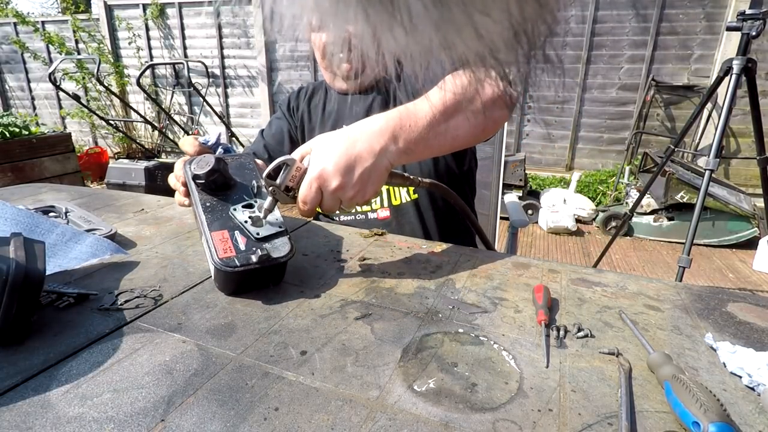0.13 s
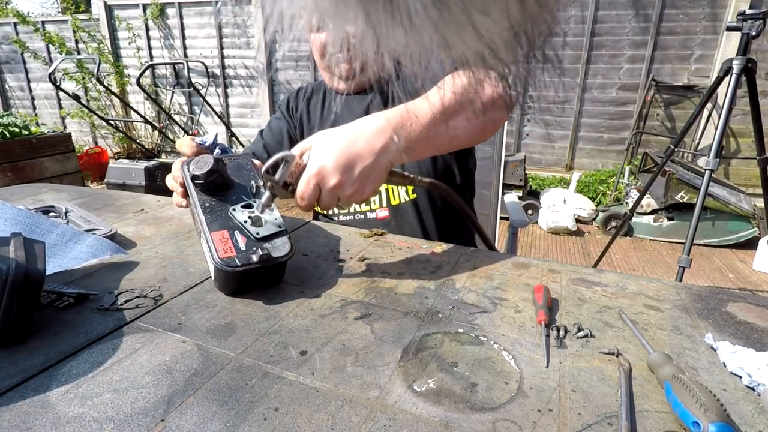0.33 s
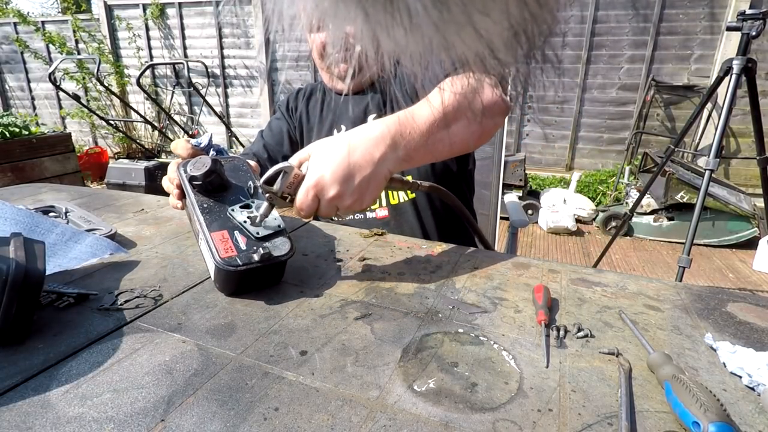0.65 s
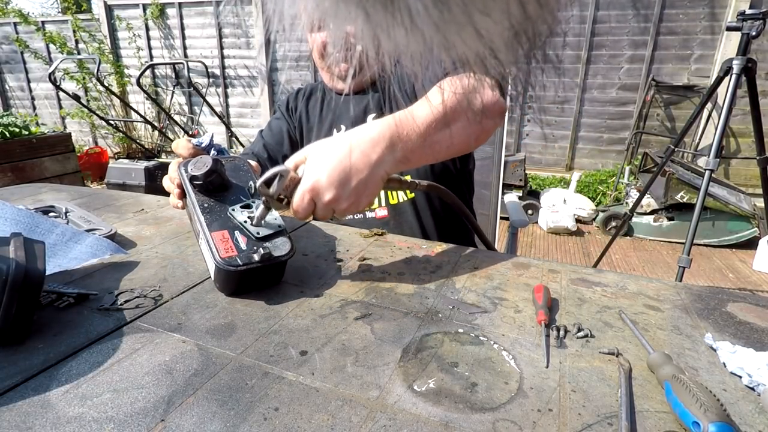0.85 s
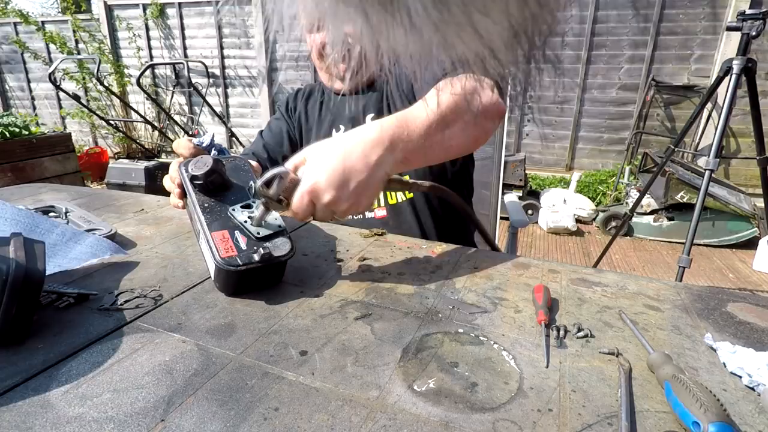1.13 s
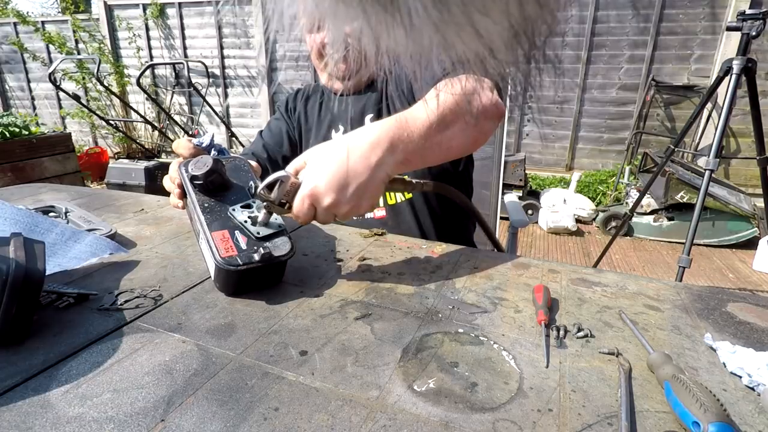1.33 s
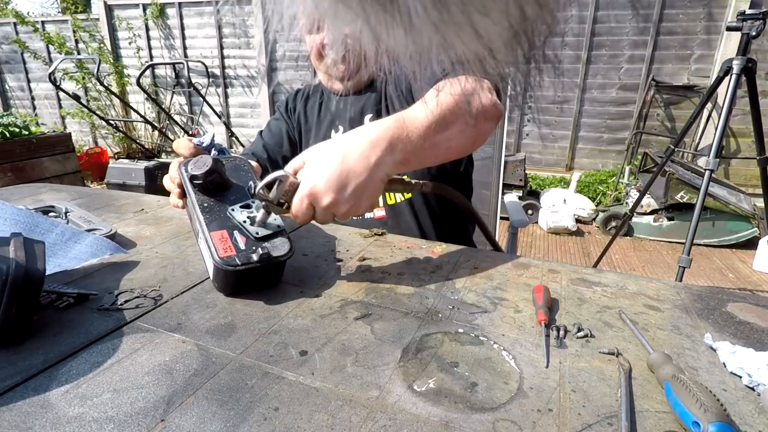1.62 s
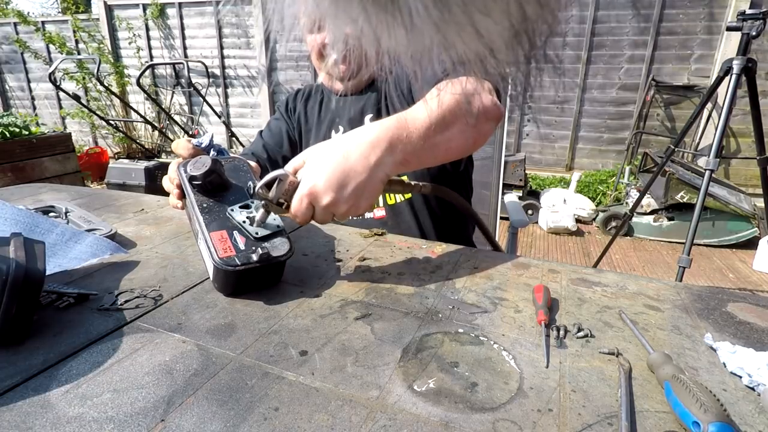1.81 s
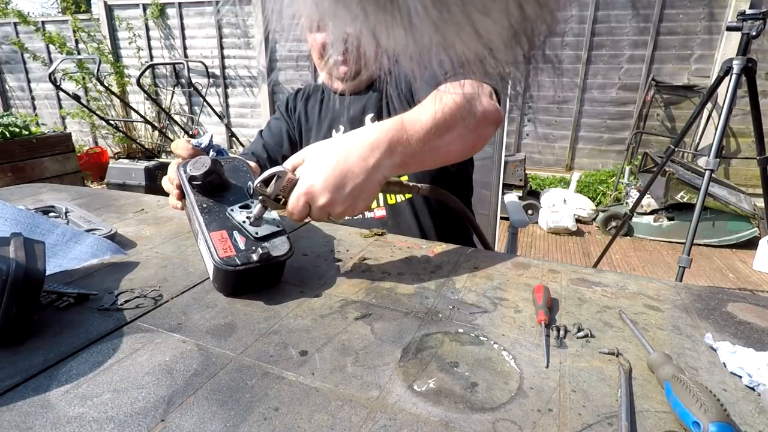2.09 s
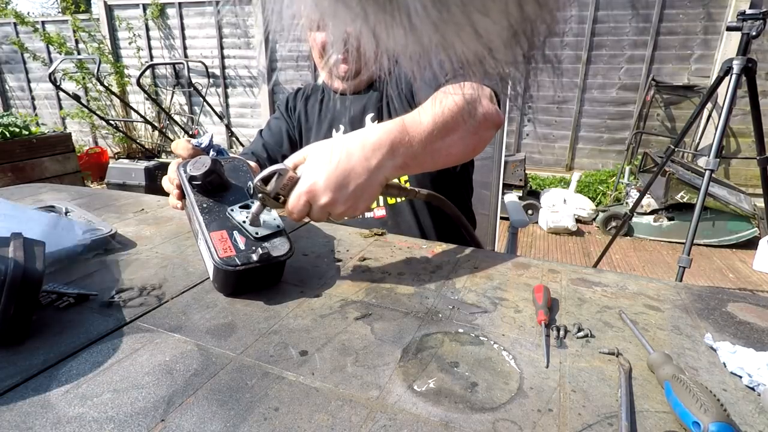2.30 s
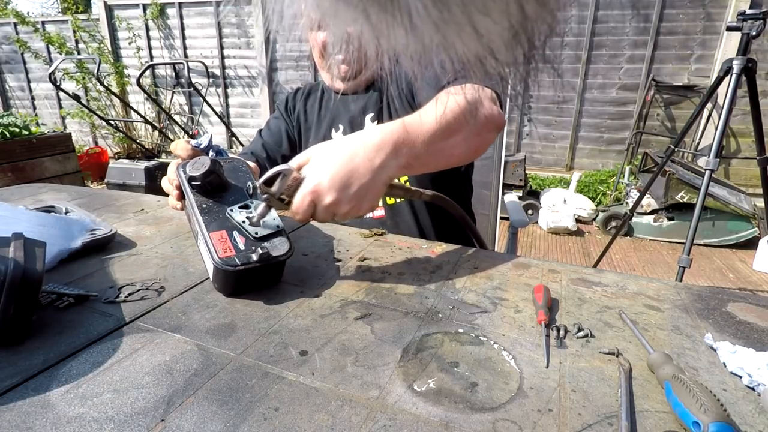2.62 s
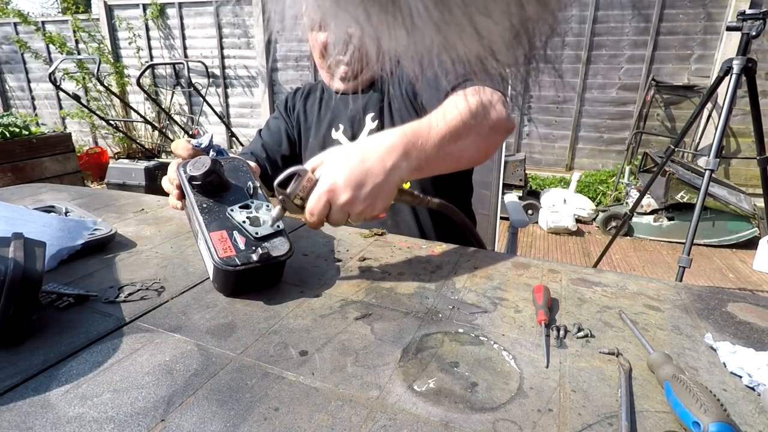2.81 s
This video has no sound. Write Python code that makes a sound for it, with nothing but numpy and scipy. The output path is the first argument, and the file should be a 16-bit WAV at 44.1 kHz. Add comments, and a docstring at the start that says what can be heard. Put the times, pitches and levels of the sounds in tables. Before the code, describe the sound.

A compressed-air blow gun hisses over a small engine part, one short blast, one long.

```python
"""An outdoor bench in a fenced yard: a blow gun cleans a small engine part, one short blast, one long.
The turbulent jet hisses, and roars and sputters in the hollows of the part; passing holes and edges
it whistles and squeals. Two knocks excite the modes of the part, stray air buffets the microphone,
and the bench and the yard return a faint tail."""
import sys
import numpy as np
from scipy import signal
from scipy.fft import rfft, irfft
from scipy.io import wavfile
from scipy.ndimage import uniform_filter1d

SR = 44100
rng = np.random.default_rng(int(sys.argv[2]) if len(sys.argv) > 2 else 0)


def pcm_store(signal):
    """Save signal as 16-bit PCM."""
    levels = np.round(np.clip(np.atleast_2d(signal), -1, 1) * 32767)
    wavfile.write(sys.argv[1], SR, levels.astype(np.int16).T)


N = 130095

# Spectra: frequency_hz, relative_db
BUFFET_SPECTRUM = [(5, 4.5), (24, -7.5), (40, -3), (55, -16.5), (80, -19.5), (130, -21), (250, -44.5),
                   (1000, -62.5), (16000, -100)]
AMBIENT_SPECTRUM = [(20, 0.5), (100, -6.5), (150, 7.5), (220, -11.5), (500, -15), (1200, -19),
                    (2400, -21.5), (3600, -16), (5200, -30), (16000, -39)]
PUFF_SPECTRUM = [(10, 2.5), (40, -8), (120, -18), (170, -7), (300, -36.5), (2000, -73.5), (16000, -88.5)]
ROAR_SPECTRUM = [(200, -46), (1700, -41.5), (2200, -25.5), (2700, -9), (3080, 1.5), (3400, 1.5),
                 (3800, -3.5), (4050, -8), (4300, -18), (4550, -16.5), (5100, -22), (5500, -33),
                 (9000, -35.5), (16000, -48.5)]
RUSH_SPECTRUM = [(60, -36), (150, -23.5), (190, -14), (230, -6), (290, -9), (420, -16.5), (520, -13),
                 (620, -17.5), (900, -11), (1180, -7.5), (1350, -19.5), (1650, -7.5), (1850, -8.5),
                 (2200, 2), (2420, 3), (2700, 1), (3500, -4), (5500, -26), (16000, -30)]
HISS_SPECTRUM = [(500, -39), (5000, -20.5), (8300, -15.5), (9200, -7.5), (10300, -7.5), (11100, -7),
                 (12050, -0.5), (12700, -1.5), (13900, 3), (15200, -3), (16000, -8.5)]
FREE_JET_SPECTRUM = [(150, -17.5), (300, 2), (2000, 1), (4700, 3.5), (5550, -6.5), (6150, 1), (6700, 0),
                     (7400, -2.5), (7800, 7), (8350, -6.5), (9200, -5.5), (11000, -15.5), (12200, -3.5),
                     (16000, -6)]
SURGE_SPECTRUM = [(1000, -32.5), (6000, -15), (6900, -10), (7800, -15), (8400, -10), (8900, 2), (9300, 1),
                  (10000, 0), (11200, -2.5), (12200, 0), (14000, -13.5), (16000, -28)]
THUD_SPECTRUM = [(60, -7.5), (300, 5.5), (600, 3.5), (1700, -0.5), (3000, -3.5), (3800, -14.5),
                 (5000, -32.5), (14000, -47)]
ECHO_SPECTRUM = [(200, 0), (1500, 0.5), (2400, -3), (3100, -4.5), (4200, -0.5), (6500, 2), (15000, 1)]
# Envelopes: time_s, relative_db
BUFFET_LEVELS = [(0, -46), (.2, -63), (.3, -41.5), (.55, -58.5), (.8, -41), (1.05, -50), (1.24, -35.5),
                 (1.31, -54), (1.38, -58), (1.47, -51), (1.58, -35.5), (1.7, -55), (1.79, -32.5),
                 (1.87, -58), (2.0, -35), (2.09, -42), (2.15, -50), (2.4, -44), (2.46, -41), (2.65, -43.5),
                 (2.78, -48.5), (2.95, -56)]  # stray air at the microphone
ROAR_STRETCHES = [
    [(0.232, -24.5), (0.248, -15.5), (0.278, -21), (0.286, -18.5), (0.31, -19.5), (0.412, -26)],
    [(0.58, -24), (0.59, -24), (0.61, -20.5), (0.772, -26), (0.778, -27), (0.93, -24), (0.974, -25.5),
     (0.984, -26.5), (1.078, -24.5), (1.088, -21.5), (1.238, -25.5), (1.252, -46.5), (1.268, -30.5),
     (1.33, -25.5), (1.338, -18), (1.356, -26.5), (1.414, -25.5), (1.456, -22), (1.5, -23.5)],
    [(1.5, -23.5), (1.554, -28), (1.572, -21.5), (1.646, -28), (1.688, -23), (1.718, -29), (1.728, -18),
     (1.738, -27), (1.792, -23), (1.8, -19), (1.822, -26.5), (1.86, -22), (2.074, -27), (2.098, -19.5),
     (2.106, -25), (2.138, -20), (2.204, -27.5), (2.214, -24.5), (2.25, -23.5)],
    [(2.25, -27.5), (2.272, -41), (2.344, -32), (2.348, -27.5), (2.514, -20), (2.534, -26.5), (2.63, -24)],
    [(2.63, -26.5), (2.676, -19.5), (2.72, -41)],
]  # hollows struck by the jet
RUSH_STRETCHES = [
    [(0.245, -40), (0.261, -25.5), (0.297, -38.5), (0.305, -29), (0.367, -32.5), (0.377, -37),
     (0.401, -57.5), (0.41, -37.5)],
    [(0.59, -34.5), (0.604, -34), (0.716, -29), (0.834, -35.5), (0.936, -27), (0.946, -34.5), (1.108, -30),
     (1.126, -43.5), (1.142, -30.5), (1.26, -37), (1.27, -27.5), (1.346, -37), (1.352, -67), (1.42, -36),
     (1.484, -30), (1.5, -28)],
    [(1.5, -29.5), (1.638, -40), (1.69, -30.5), (1.828, -40.5), (1.866, -29), (1.906, -35.5), (2.196, -34),
     (2.226, -29.5), (2.274, -42), (2.43, -28), (2.444, -44.5), (2.46, -25.5), (2.522, -28.5),
     (2.546, -36.5), (2.668, -27.5), (2.72, -46)],
]  # low rush of air over the part
HISS_LEVELS = [(.24, -35), (.28, -25.5), (.34, -30), (.41, -32), (.59, -29), (.64, -26.5), (.70, -33),
               (.78, -28.5), (.88, -31), (1.0, -30.5), (1.07, -27.5), (1.13, -28), (1.2, -39), (1.235, -33),
               (1.275, -45), (1.31, -28), (1.4, -28), (1.48, -31.5), (1.55, -28.5), (1.58, -22.5),
               (1.65, -31.5), (1.77, -30), (1.9, -32), (2.0, -29), (2.07, -31), (2.13, -27), (2.24, -29.5),
               (2.275, -38.5), (2.33, -37.5), (2.37, -31.5), (2.44, -29), (2.55, -33.5), (2.67, -27.5),
               (2.72, -38)]  # treble hiss
FREE_JET_LEVELS = [(.24, -36.5), (.3, -34.5), (.41, -42), (.6, -35.5), (.7, -36.5), (.8, -39), (1.0, -38),
                   (1.12, -37), (1.2, -34.5), (1.265, -39), (1.34, -34), (1.45, -39.5), (1.55, -37.5),
                   (1.585, -31), (1.64, -42), (1.9, -37), (2.06, -36.5), (2.15, -38.5), (2.29, -37),
                   (2.36, -34), (2.44, -34.5), (2.53, -36.5), (2.65, -37.5), (2.72, -34)]  # broad hiss of the free jet
# Gusts that thump the microphone: centre_s, level_db, length_s
PUFFS = [(1.368, -43, 0.039), (1.785, -59, 0.081), (2.01, -65, 0.048)]
# Trigger pulls: open_s, close_s
BLASTS = [(0.212, 0.41), (0.56, 2.723)]
# Bright swells early in each blast: peak_s, level_db, rise_s, fade_db_per_s
SURGES = [(.285, -24.5, 0.093, 89), (.625, -29.5, 0.12, 135), (.8, -37.5, 0.04, 16.5)]
# Modes of the part: pitch_hz, t60_s, knocked_gain_db, blown_gain_db
PART_MODES = [(235, .13, -10, -32), (511, .28, -5, -41), (700, .11, -4, -42), (980, .06, -2, -37),
              (1085, .12, -4, -37), (1660, .13, -2, -40), (2352, .09, -5, -25), (2568, .1, -7, -34),
              (2762, .14, -4, -25), (2990, .06, 1, -23), (3100, .05, -8, -19), (3338, .06, -14, -20),
              (3852, .08, -20, -26)]
# Knocks on the part: start_s, ring_gain_db, thud_gain_db
KNOCKS = [(.213, -48, -34), (2.877, -51, -39)]
# Decay of reflections from the bench top and the yard: frequency_hz, t60_s
BENCH_DECAY = [(200, 0.14), (3000, 0.052), (15000, 0.031)]
YARD_DECAY = [(200, .5), (1000, .45), (2200, .4), (3100, .38), (4200, .48), (6500, .48), (9000, .32),
              (15000, .25)]
# Tones left as the air is cut: start_s, pitch_hz, level_db, t60_s
AFTER_RINGS = [(.413, 2767, -45, .15), (.405, 236, -46, .2), (2.722, 1071, -58, .17)]
# Breathy squeals: start_s, length_s, first_hz, last_hz, level_db
SQUEALS = [(0.744, .05, 14000, 14200, -33), (1.101, 0.026, 13700, 13400, -28),
           (1.167, 0.054, 13700, 14000, -30.5), (1.329, 0.021, 12100, 12250, -25),
           (1.352, 0.055, 12780, 12700, -24.5), (1.56, 0.048, 12360, 12300, -28.5),
           (1.609, .024, 12600, 12700, -29), (1.792, 0.049, 12340, 12850, -25.5),
           (0.657, .09, 5450, 5350, -41), (2.684, 0.05, 6410, 6340, -45.5)]
# Edge tones: start_s, length_s, top_hz, top_fraction, droop_hz, level_db, jitter_hz
WHISTLES = [(1.229, 0.032, 15180, .46, 1040, -25, 40), (2.345, .021, 14900, 0.1, 450, -28.5, 169),
            (1.225, 0.0074, 5200, 0.2, 99, -30, 40), (1.24, 0.031, 5170, .3, 80, -46, 79.4),
            (2.275, 0.045, 5090, 0.6, 110, -34, 60), (2.315, 0.056, 5030, 0.6, 60, -45, 130)]


def amp(db):
    return 10 ** (np.asarray(db) / 20)


def unit(x):
    return x / np.sqrt(np.mean(x ** 2) + 1e-20)


def by_pitch(points, hz):
    f, value = np.transpose(points)
    return np.interp(np.log(hz + 1), np.log(f + 1), value)


def by_time(points):
    s, value = np.transpose(points)
    return np.interp(np.arange(N) / SR, s, value)


def add(mix, s, sound):
    part = mix[max(round(s * SR), 0):][:len(sound)]
    part += sound[:len(part)]


def noise(spectrum):
    """Spectral shaping: white noise takes the given spectrum, at rms 1."""
    gain = amp(by_pitch(spectrum, np.fft.rfftfreq(N, 1 / SR)))
    return unit(irfft(rfft(rng.standard_normal(N)) * gain, N))


def wander(top_hz, low_hz=0):
    """Band-limited fluctuation: a random drift of rms 1 between two rates."""
    hz = np.fft.rfftfreq(N, 1 / SR)
    gain = (hz > low_hz) / np.sqrt(1 + (hz / top_hz) ** 4)
    return unit(irfft(rfft(rng.standard_normal(N)) * gain, N))


def stray_air(ambient_db=-70):
    """Pressure fluctuation: gusts buffet the microphone over the quiet of the yard."""
    out = noise(BUFFET_SPECTRUM) * amp(by_time(BUFFET_LEVELS) + 1.3 * wander(18))
    out += amp(ambient_db) * noise(AMBIENT_SPECTRUM)
    for centre, db, length in PUFFS:
        swell = np.hanning(int(length * SR))
        add(out, centre - length / 2, amp(db) * unit(swell * noise(PUFF_SPECTRUM)[:len(swell)]))
    return out


def valve(opening_s=.036, closing_s=.0097):
    """Throttling: the flow, 0 to 1, follows the trigger as it eases open and snaps shut."""
    t = np.arange(N) / SR
    travel = sum(np.clip((t - on) / opening_s, 0, 1) * np.clip(1 - (t - off) / closing_s, 0, 1)
                 for on, off in BLASTS)
    return travel ** 2


def drifting_noise(spectrum, depth_db=1.8, patch_hz=700, patch_s=.06):
    """Spectral modulation: noise bands swell and sink independently as the nozzle moves."""
    bands = signal.stft(noise(spectrum), nperseg=512, noverlap=384)[2]
    patches = uniform_filter1d(rng.standard_normal(bands.shape), round(patch_hz * 512 / SR), axis=0)
    patches = unit(uniform_filter1d(patches, round(patch_s * SR / 128), axis=1))
    return unit(signal.istft(bands * amp(depth_db * patches), nperseg=512, noverlap=384)[1][:N])


def jet():
    """Turbulent mixing: the same eddies shake the noise of the free jet and of air striking the part."""
    t = np.arange(N) / SR
    flutter_db = wander(44.5, low_hz=7.6)
    sputter_db = 1.14 * wander(420, low_hz=41.8)
    shake_db = flutter_db + sputter_db
    roar = drifting_noise(ROAR_SPECTRUM) * amp(by_time(np.vstack(ROAR_STRETCHES)) + shake_db - .5)
    rush = drifting_noise(RUSH_SPECTRUM) * amp(by_time(np.vstack(RUSH_STRETCHES)) + shake_db + 3.5)
    hiss = drifting_noise(HISS_SPECTRUM) * amp(by_time(HISS_LEVELS) + .5 * shake_db - .4)
    hiss *= amp(1.2 * wander(170, low_hz=9.2))  # the treble flickers
    free_jet = drifting_noise(FREE_JET_SPECTRUM) * amp(by_time(FREE_JET_LEVELS) + .5 * shake_db)
    swell = sum(np.clip(1 + (t - peak) / rise, 0, 1) * amp(db - fade * np.maximum(t - peak, 0))
                for peak, db, rise, fade in SURGES)
    surge = swell * drifting_noise(SURGE_SPECTRUM) * amp(.74 * shake_db)
    return valve() * (roar + rush + hiss + free_jet + surge)


def part_resonance(air):
    """Forced vibration: the blast drives the modes of the part, which ring on after it stops."""
    out, t = np.zeros(N), np.arange(SR // 2) / SR
    for hz, t60, _, db in PART_MODES:
        mode = amp(-60 * t / t60) * np.sin(2 * np.pi * hz * t)
        out += amp(db) * unit(signal.fftconvolve(air, mode)[:N])
    return air.std() * out


def knocks(attack_s=.0018, thud_s=.008, clatter_s=.026, clatter_db=-13):
    """Impact excitation: the part rings over a dull thud, which the bench smears into a clatter."""
    out, t = np.zeros(N), np.arange(SR // 2) / SR
    attack = np.minimum(t / attack_s, 1)
    thud_decay = np.exp(-t / thud_s) + amp(clatter_db) * np.exp(-t / clatter_s)
    for start, ring_db, thud_db in KNOCKS:
        ring = sum(amp(db - 60 * t / t60) * np.sin(2 * np.pi * (hz * t + rng.random()))
                   for hz, t60, db, _ in PART_MODES)
        thud = noise(THUD_SPECTRUM)[:len(t)] * thud_decay
        add(out, start, attack * (amp(ring_db) * ring + amp(thud_db) * thud))
    return out


def reflections(sound, t60s):
    """Reverberation: a diffuse tail in which the highest treble dies first."""
    hz, t, bands = signal.stft(rng.standard_normal(SR), SR, nperseg=256)
    gain_db = by_pitch(ECHO_SPECTRUM, hz)[:, None] - 60 * t / by_pitch(t60s, hz)[:, None]
    tail = signal.istft(bands * amp(gain_db), SR, nperseg=256)[1]
    return signal.fftconvolve(sound, tail / np.linalg.norm(tail))[:N]


def after_rings():
    """Free decay: the spot facing the nozzle rings on as the air is cut."""
    out, t = np.zeros(N), np.arange(SR // 2) / SR
    for start, hz, db, t60 in AFTER_RINGS:
        add(out, start, amp(db - 60 * t / t60) * np.sin(2 * np.pi * hz * t))
    return out


def squeals(width_hz=900):
    """Narrow-band turbulence: a half-formed whistle is noise around a gliding pitch."""
    out = np.zeros(N)
    for start, length, first_hz, last_hz, db in SQUEALS:
        progress = np.linspace(0, 1, int(length * SR))
        fuzz = (wander(width_hz / 2) + 1j * wander(width_hz / 2))[:len(progress)]
        hz = first_hz + (last_hz - first_hz) * progress
        carrier = np.exp(2j * np.pi * np.cumsum(hz) / SR)
        swell = np.sqrt(progress * (1 - progress))
        add(out, start, amp(db) * unit(swell * (fuzz * carrier).real))
    return out


def whistles():
    """Edge tone: as the jet crosses a hole, a tone swells, arches in pitch and breaks off."""
    out = np.zeros(N)
    for start, length, top_hz, top_at, droop_hz, db, jitter_hz in WHISTLES:
        progress = np.linspace(0, 1, int(length * SR))
        arch_hz = top_hz - droop_hz * abs(2 * (progress - top_at)) ** 1.6
        hz = arch_hz + jitter_hz * wander(500)[:len(progress)]
        swell = np.sqrt(progress * (1 - progress))
        add(out, start, amp(db) * unit(swell * np.sin(2 * np.pi * np.cumsum(hz) / SR)))
    return out


def scene(bench_db=-17.5, yard_db=-26):
    """Superposition: direct sound, reflections and stray air add in one channel."""
    air = jet()
    direct = air + part_resonance(air) + after_rings() + whistles() + squeals() + knocks()
    bench = amp(bench_db) * reflections(direct, BENCH_DECAY)
    yard = amp(yard_db) * reflections(direct, YARD_DECAY)
    return (direct + bench + yard + stray_air())[None]


def record(dry):
    """Band limiting: a steep low-pass filter removes the highest treble."""
    lowpass = signal.firwin(401, cutoff=15450, window=("kaiser", 9), fs=SR)
    return signal.oaconvolve(dry, lowpass[None], "same")


dry = scene()
out = record(dry)
pcm_store(out)
```